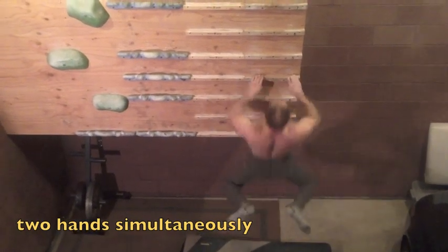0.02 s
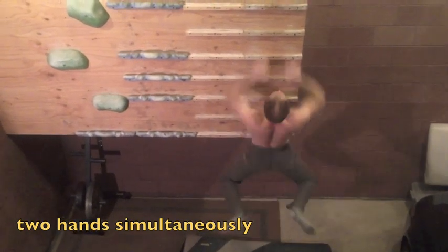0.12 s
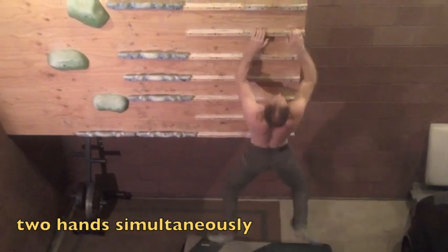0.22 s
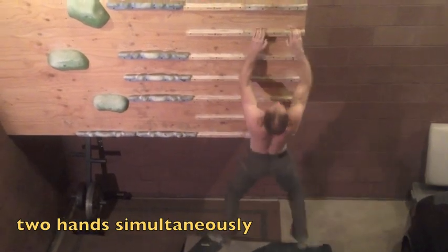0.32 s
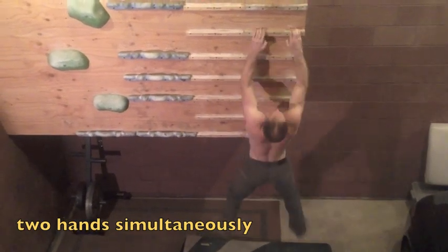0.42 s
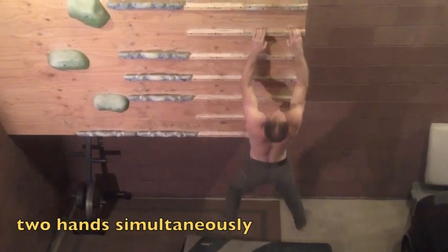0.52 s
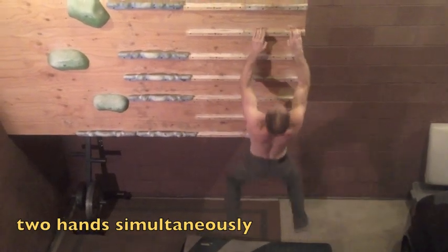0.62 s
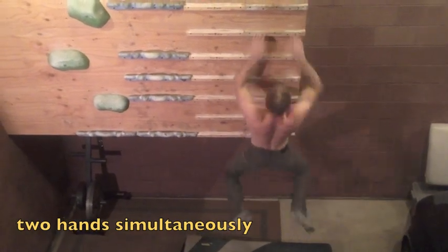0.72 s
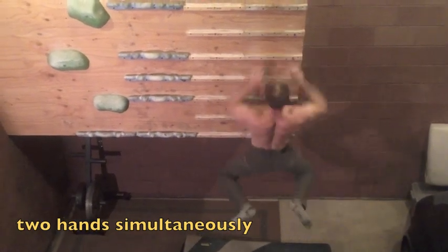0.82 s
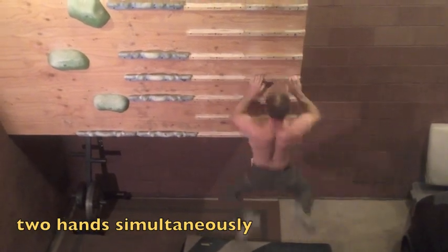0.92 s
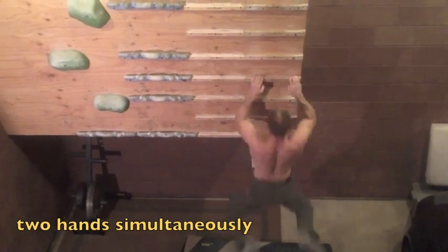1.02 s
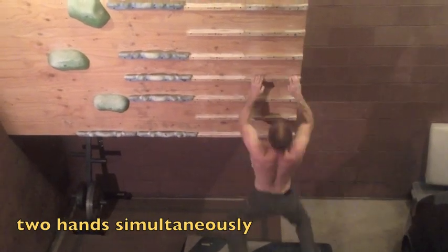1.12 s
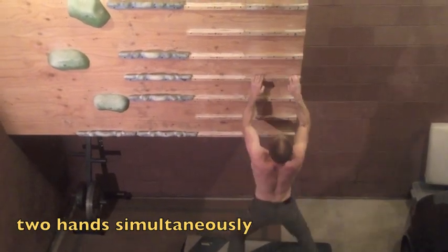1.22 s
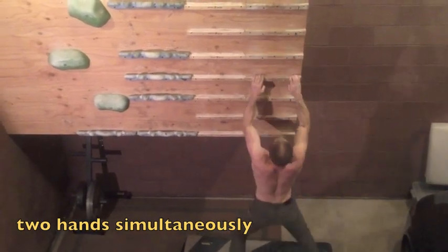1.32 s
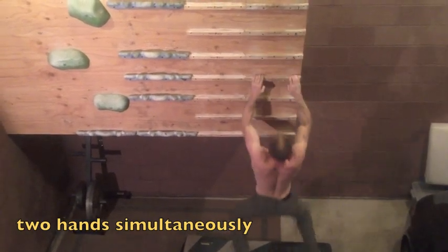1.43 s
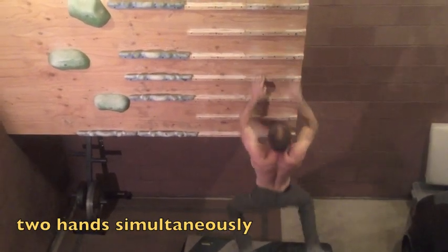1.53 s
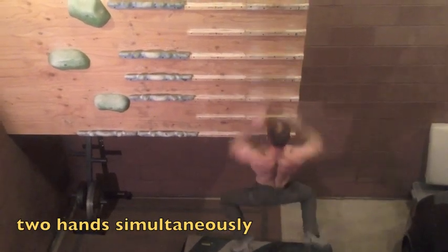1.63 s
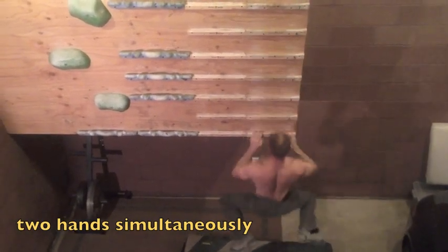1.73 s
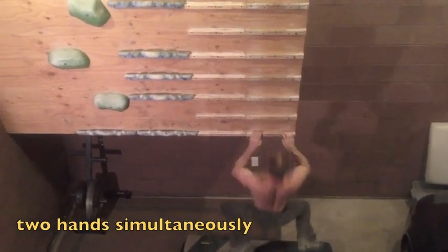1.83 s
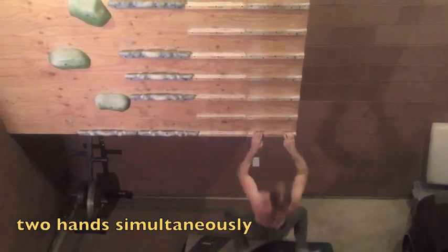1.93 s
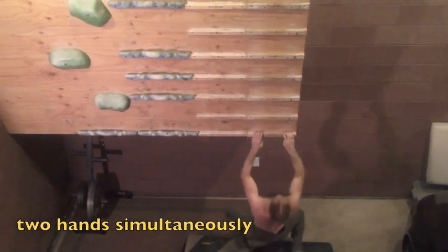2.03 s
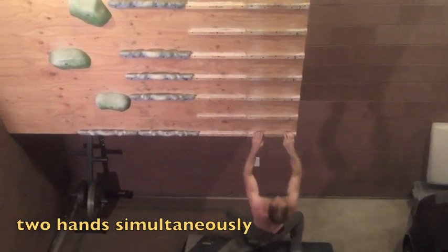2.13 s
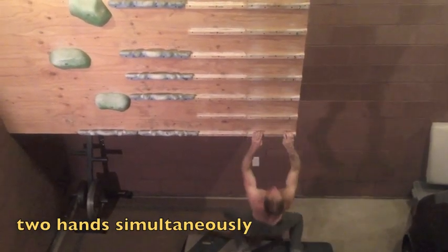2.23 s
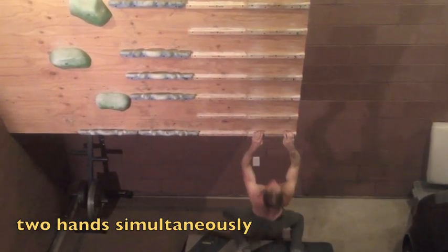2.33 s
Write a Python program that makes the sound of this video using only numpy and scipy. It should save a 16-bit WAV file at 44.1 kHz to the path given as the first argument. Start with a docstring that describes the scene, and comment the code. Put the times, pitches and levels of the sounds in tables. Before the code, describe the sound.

Hands slap and knock on the rungs of a hollow wooden climbing board. A short finger scuff leads to the first landing at 0.2 seconds, a skin smack with a quick run of knocks. Scuffs at 0.7 and 1.6 seconds lead to similar landings at 0.9 and 1.7. A faint scuff follows at 2.1. The small hard room echoes briefly, and a quiet airy hum continues throughout.

```python
"""Two hands drop from rung to rung of a wooden climbing board in a small hard room.
First the fingers scuff off a rung. At 0.2 s fingers, palms and body weight land on the top rung:
the skin smacks and a quick run of knocks rings the hollow board and the room. Another scuff leads to
the middle rung at 0.9 s, then a faint scuff and a strong one lead to the low rung at 1.7 s. A last
faint scuff follows at 2.1 s. All along, the room echoes the hands and a steady airy hum fills it."""
import sys
import numpy as np
from scipy import signal
from scipy.fft import rfft, irfft
from scipy.io import wavfile

SR = 44100
rng = np.random.default_rng(int(sys.argv[2]) if len(sys.argv) > 2 else 0)


def unload_audio(sound):
    """Save the sound as a 16-bit wav file, at the path given as the first command line argument."""
    columns = np.transpose(np.atleast_2d(sound))
    # keep every value between -1 and 1, then stretch to whole-number steps
    steps = np.round(np.clip(columns, -1, 1) * 32767)
    wavfile.write(sys.argv[1], SR, steps.astype(np.int16))


N = 105840

# Knocks of fingers and palms: t/s, rung (0 top, 1 middle, 2 low), level/dB, hardness/(dB per octave)
RUNG_KNOCKS = [(0.2241, 0, -22.5, -0.5), (.2315, 0, -31.5, -2.5), (.2385, 0, -21, 2.5),
               (0.2439, 0, -25.5, -7), (.249, 0, -18.5, -2.5), (.257, 0, -20.5, 2), (.269, 0, -23.5, 2),
               (.277, 0, -37, -6), (.292, 0, -33.5, -10.5), (0.8746, 1, -24, -0.5), (.879, 1, -24.5, -9),
               (.884, 1, -21, -1.5), (.8945, 1, -22, -3.5), (.906, 1, -29.5, 12.5), (.911, 1, -34, 6),
               (0.923, 1, -20, -1.5), (.947, 1, -29, -3), (.962, 1, -34, 6.5), (1.706, 2, -24.5, -1.5),
               (1.713, 2, -22.5, 1.5), (1.718, 2, -20, -10.5), (1.726, 2, -26, -8.5),
               (1.735, 2, -25.5, -11.5), (1.741, 2, -26, -4), (1.756, 2, -21, -6), (1.765, 2, -24.5, -5),
               (1.781, 2, -34.5, -0.5), (1.788, 2, -24.5, -5.5)]
# Tones that ring after each knock, from the board and the room:
# f/Hz, time to fade 60 dB/s, level/dB from the top, middle and low rung
RINGING_TONES = [(144.2, 0.407, -33.5, -22, -30), (194, 0.092, -7, -7, -11.5),
                 (243.7, 0.19, -11.5, -22, -22.5), (290, 0.13, -3.5, -18, -10),
                 (347, 0.18, -2.5, -9.5, -10.5), (389.5, 0.072, 4, -9, -5.5), (460.7, 0.11, 1.5, -23, -6),
                 (550.8, 0.094, -6.5, -9, -10), (624, 0.061, -8, -17, -1.5), (702, 0.091, -6, -8, 3.5),
                 (767, 0.067, -16, -7, -1), (906, 0.087, -5, -2, -28), (971, 0.068, -4.5, -12.5, -3.5),
                 (1108, 0.11, -8, -31, 2), (1597, .07, -13.5, -33, -4), (2920, 0.046, -22, -25, -28)]
def board_knocks():
    """Each knock is a short soft push that rings board and room; hard knocks favour the high tones."""
    times, rungs, level_db, hardness = np.transpose(RUNG_KNOCKS)
    ringing = 0
    for k, (hz, fade_s, *rung_db) in enumerate(RINGING_TONES):
        push_db = level_db + hardness * np.log2(hz / 400) + np.array(rung_db)[rungs.astype(int)]
        pushes = np.full(N, 1e-18)
        pushes[(times * SR).astype(int)] = (-1) ** k * from_db(push_db)  # every other tone is flipped
        fade, turn = from_db(-60 / (fade_s * SR)), 2 * np.pi * hz / SR
        # This filter turns each push into a fading sine wave.
        ringing += signal.lfilter([0, np.sin(turn)], [1, -2 * fade * np.cos(turn), fade ** 2], pushes)
    contact_s = 0.00024  # a longer touch sounds duller
    soft = np.exp(-1 / (contact_s * SR))
    return signal.lfilter([(1 - soft) ** 2], [1, -2 * soft, soft ** 2], ringing)


# Hands landing: t/s, rise/s, hold/s, body level/dB, treble level/dB
LANDINGS = [(0.223, 0.0051, 0.014, -35, -51.5), (0.872, 0.0024, 0.042, -38, -51),
            (1.697, 0.017, 0.046, -35, -50)]
# Tone colour of skin hitting wood: f/Hz, level/(dB per Hz)
SMACK_COLOUR = [(900, 0), (1300, -7.5), (1570, -5), (1960, -13), (2400, -11.5), (2900, -14.5),
                (3400, -20.5), (4440, -31), (7130, -26.5), (8300, -30), (9810, -39), (11200, -34.5),
                (15200, -33.5)]
def skin_smacks():
    """The skin gives a short hiss as the hands land."""
    body, treble = body_and_treble(coloured(skin_grains(), SMACK_COLOUR))
    return sum((from_db(body_db) * body + from_db(treble_db) * treble)
               * envelope(start, rise, hold, fade_s=0.16)
               for start, rise, hold, body_db, treble_db in LANDINGS)


# Fingers sliding on a rung: peak t/s, rise/s, body level/dB, treble level/dB, thud level/dB
SLIDES = [(0.087, 0.039, -50.5, -60, -70), (0.747, 0.059, -41.5, -53, -50.5), (1.27, 0.18, -68, -70, -81),
          (1.562, 0.065, -40, -53, -46.5), (2.108, 0.052, -70, -67.5, -72)]
# Tone colour of skin rubbing wood: f/Hz, level/(dB per Hz)
SCUFF_COLOUR = [(500, -16), (750, -11.5), (950, 2.5), (1250, 0.5), (1780, -1), (2410, -5.5), (3300, -16.5),
                (4030, -27), (6450, -23), (8200, -24), (10000, -35.5), (12500, -29), (15200, -30)]
def finger_scuffs():
    """Rubbing swells until the fingers leave; freed of their weight, the board gives a low thud."""
    body, treble = body_and_treble(coloured(skin_grains(), SCUFF_COLOUR))
    thud = rms_one(resonance(rng.standard_normal(N), hz=180, width_hz=40))
    lead_s, lag_s = 0.024, 0.011  # the treble starts before the body and peaks after it
    out = 0
    for peak, rise, body_db, treble_db, thud_db in SLIDES:
        start = peak - rise
        out += from_db(body_db) * body * envelope(start, rise, 0, fade_s=0.16)
        treble_swell = envelope(start - lead_s, rise + lead_s + lag_s, 0, 0.29) ** 2
        out += from_db(treble_db) * treble * treble_swell
        out += from_db(thud_db) * thud * envelope(peak - 0.015, 0.012, 0, fade_s=0.16)
    return out


def skin_grains():
    """Skin on wood makes many tiny uneven clicks over a fine hiss."""
    clicks_per_s = 3700
    sizes = from_db(3 * np.minimum(rng.exponential(1, N), 3))
    clicks = (rng.random(N) < clicks_per_s / SR) * sizes * rng.choice([-1, 1], N)
    return rms_one(clicks) + 0.46 * rng.standard_normal(N)


# How long the room rings: f/Hz, time to fade 60 dB/s
ECHO_FADES = [(100, 0.33), (200, 0.44), (400, 0.27), (1000, 0.42), (4000, 0.55), (12000, 0.29)]
def room_echo(sound):
    """Echoes from the hard walls blur into noise; each half-octave band fades at its own rate."""
    t = np.arange(SR // 2) / SR
    edges_hz = 60 * 2 ** np.arange(0, 8.6, 0.5)
    tail, build_up_s = 0, 0.0027
    for low, high in zip(edges_hz, np.minimum(edges_hz[1:], 0.45 * SR)):
        fade_s = at_hz(ECHO_FADES, np.sqrt(low * high))
        band = filtered(rng.standard_normal(len(t)), 2, [low, high], "bandpass")
        energy = fade_s * SR / (2 * np.log(1000))  # divided out, so a longer echo is no stronger
        tail += band * from_db(-60 * t / fade_s) / np.sqrt(energy)
    return signal.fftconvolve(sound, tail * np.clip(t / build_up_s, 0, 1))[:N]


# Tone colour of the air's noise: f/Hz, level/(dB per Hz)
AIR_COLOUR = [(25, -66), (60, -60), (100, -22), (140, -18), (190, -5), (250, -17), (350, -7), (500, -6.5),
              (700, -9), (1000, -9.5), (1880, -14.5), (3300, -18.5), (4310, -33), (7770, -34),
              (8800, -41.5), (10200, -50.5), (12000, -42.5), (15200, -40.5)]
# Narrow bands that stand out in the hum: f/Hz, width/Hz, level/dB
HUM_BANDS = [(199, 4, -64.5), (290.6, 4, -64.5), (366.4, 28, -56), (517.5, 32, -58), (601, 6.8, -64),
             (756.7, 10, -61.5), (1867, 41, -63.5)]
def air_hum():
    """Steady air noise wavers a little, with a few narrow bands humming on top."""
    level_db, waver_db = -50, 0.4
    waver = rms_one(np.interp(np.arange(N), np.linspace(0, N, 24), rng.standard_normal(24)))
    out = from_db(level_db + waver_db * waver) * coloured(rng.standard_normal(N), AIR_COLOUR)
    for hz, width_hz, db in HUM_BANDS:
        band = resonance(rng.standard_normal(N + SR), hz, width_hz)[SR:]  # one second to settle
        out += from_db(db) * rms_one(band)
    return out


def from_db(db):
    """Turns decibels into a number to multiply by."""
    return 10 ** (np.asarray(db) / 20)


def rms_one(x):
    """Scales a sound to an average strength (rms) of 1."""
    return x / np.sqrt(np.mean(x ** 2) + 1e-20)


def at_hz(table, hz):
    """Reads a value between a table's frequencies."""
    freqs, values = np.transpose(table)
    return np.interp(np.log(hz), np.log(freqs), values)


def coloured(noise, colour):
    """Gives white noise a tone colour that drops steeply below the table's first row."""
    hz = np.arange(len(noise) // 2 + 1) * SR / len(noise) + 1
    gain = from_db(at_hz(colour, hz)) * np.minimum(1, hz / colour[0][0]) ** 2
    return rms_one(irfft(rfft(noise) * gain, len(noise)))


def resonance(x, hz, width_hz):
    """Lets through a narrow band around one pitch."""
    r = np.exp(-np.pi * width_hz / SR)
    gain = (1 - r * r) / 2
    return signal.lfilter([gain, 0, -gain], [1, -2 * r * np.cos(2 * np.pi * hz / SR), r * r], x)


def filtered(x, order, hz, kind):
    """Keeps the lows, the highs or a band; a higher order cuts more steeply."""
    return signal.sosfilt(signal.butter(order, hz, kind, fs=SR, output="sos"), x)


def body_and_treble(noise, split_hz=3820):
    """Splits noise into a low part (body) and a high part (treble), made equally strong."""
    return [rms_one(filtered(noise, 4, split_hz, kind)) for kind in ("lowpass", "highpass")]


def envelope(start, rise, hold, fade_s):
    """Loudness rises smoothly, holds, then drops 60 dB every fade_s seconds."""
    t = np.arange(N) / SR - start
    swell = np.sin(np.pi / 2 * np.clip(t / rise, 0, 1)) ** 2
    return swell * from_db(-60 * np.clip(t - rise - hold, 0, None) / fade_s)


def scene():
    """Board and hands echo in the room, their deep bass cut, over the hum."""
    knocks = board_knocks()
    skin = skin_smacks() + finger_scuffs()
    echo = room_echo(from_db(-6) * knocks + from_db(-2.5) * skin)
    climbing = filtered(knocks + skin + echo, order=5, hz=129.6, kind="highpass")
    return (climbing + air_hum())[None]


def record(dry):
    """Cuts off the very highest treble."""
    cutoff_hz = 15300
    return signal.sosfilt(signal.ellip(12, 0.5, 70, cutoff_hz, fs=SR, output="sos"), dry)


dry = scene()
out = record(dry)
unload_audio(out)
```